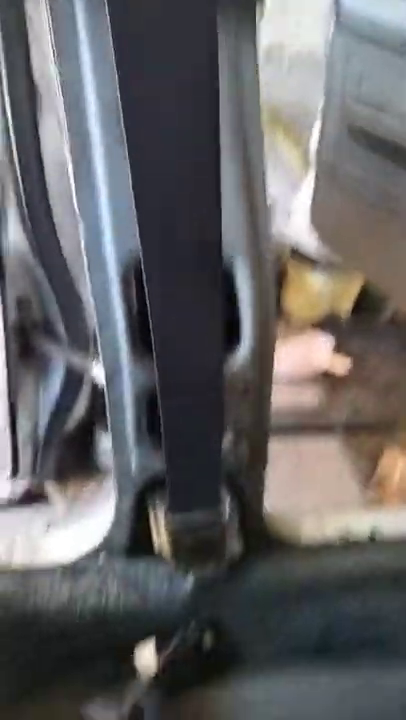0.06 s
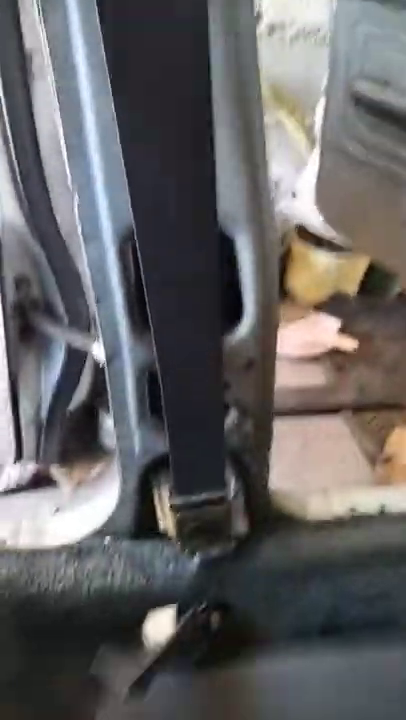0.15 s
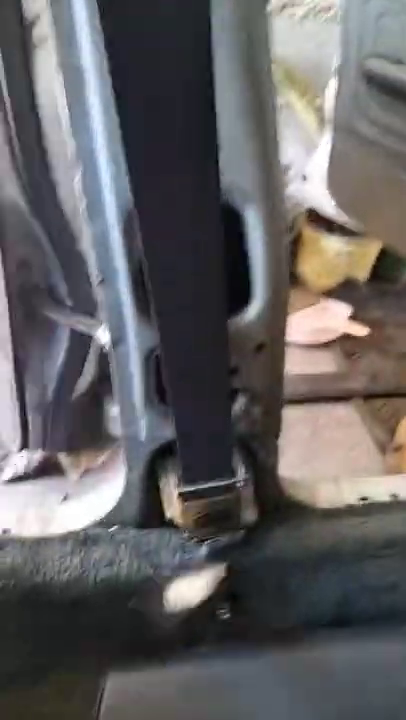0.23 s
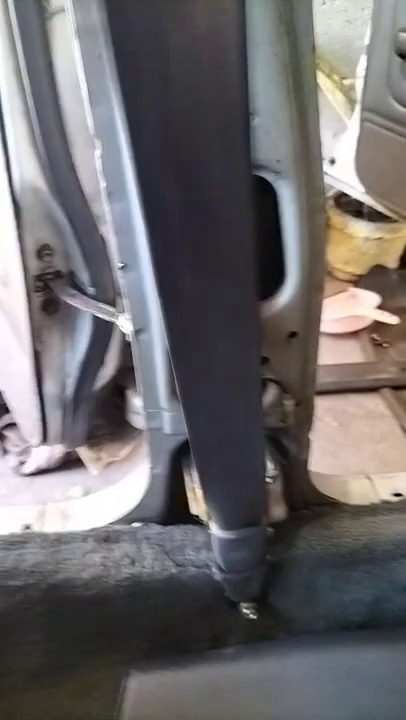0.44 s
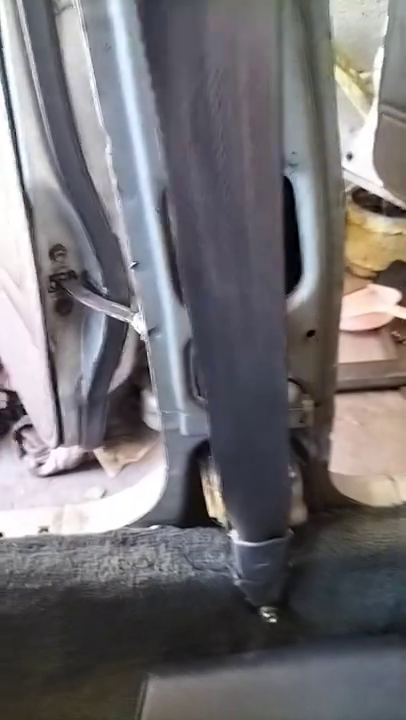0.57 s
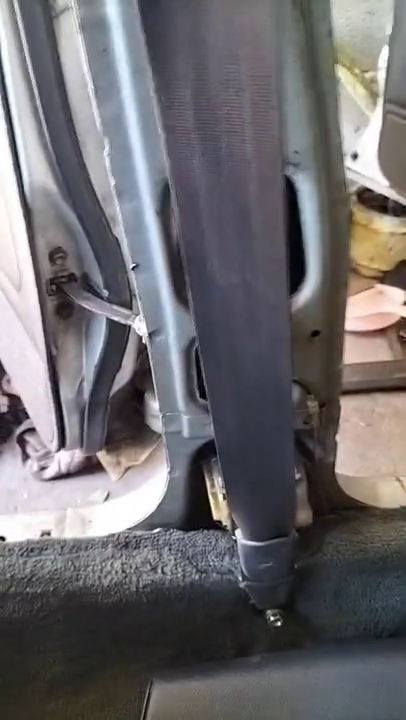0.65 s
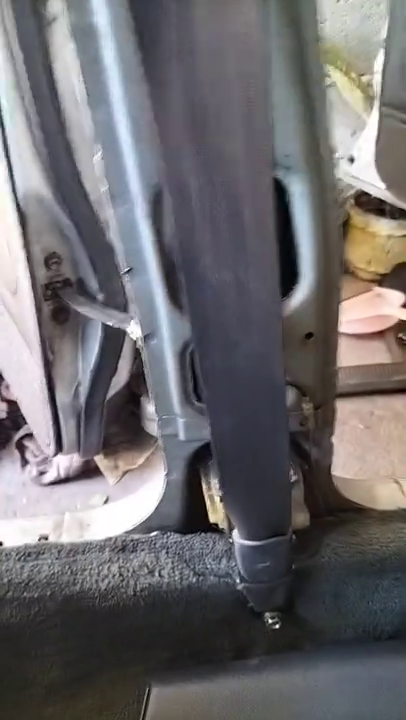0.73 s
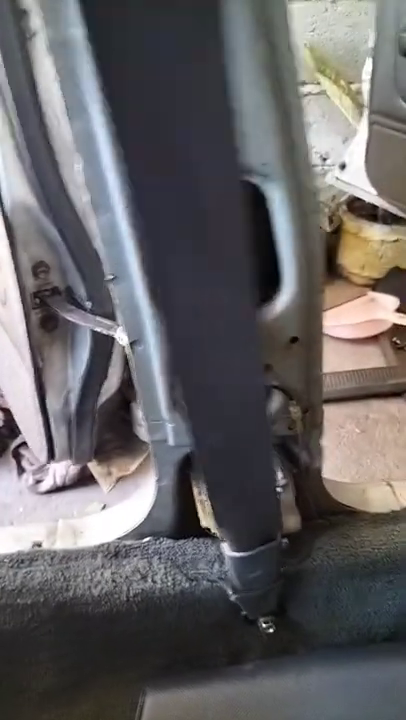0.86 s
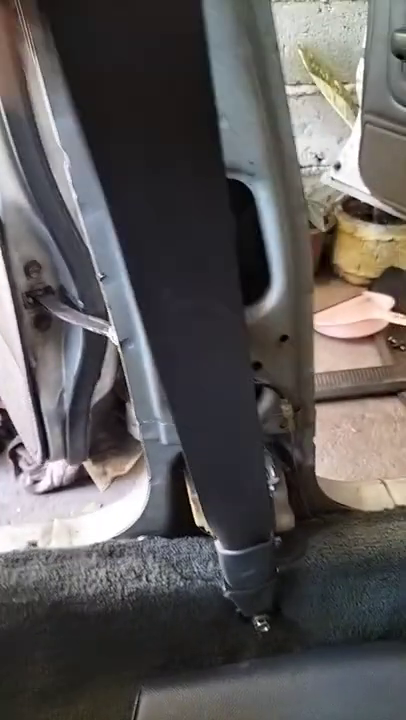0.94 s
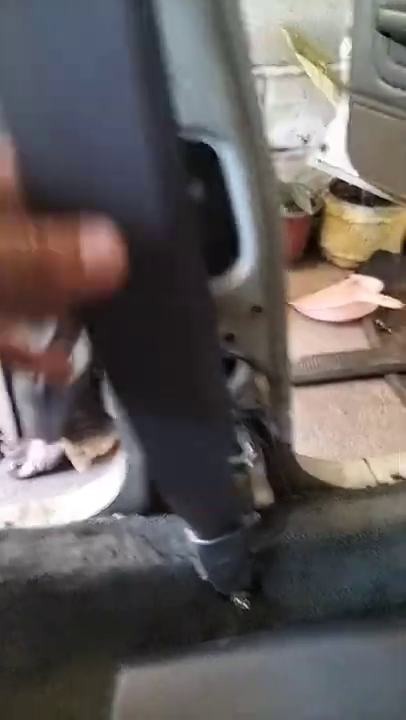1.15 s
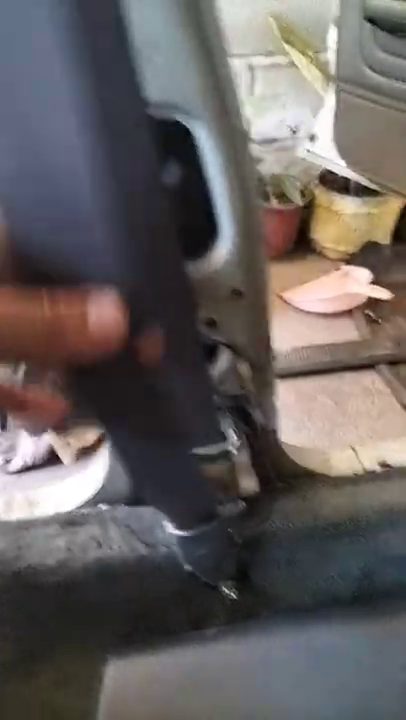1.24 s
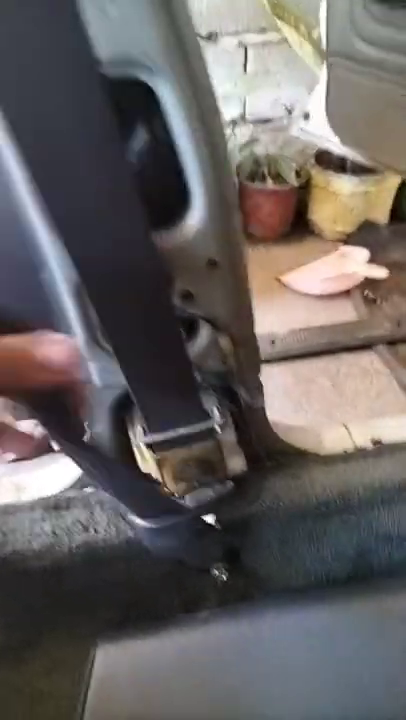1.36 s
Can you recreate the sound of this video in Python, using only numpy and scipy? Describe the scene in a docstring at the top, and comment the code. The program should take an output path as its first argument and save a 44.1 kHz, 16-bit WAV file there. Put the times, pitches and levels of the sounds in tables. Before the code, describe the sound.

A car seat belt retracts, heard close at an open door in quiet outdoor air. Soft sliding leads into a whine rising from about 0.15 to 0.37 seconds, with rushing webbing and rattling spool. Plastic knocks and metal clinks cluster from 0.32 to 0.5, then a snap at 0.58. Faint bird chirps follow, finger taps from 0.82, a brief creak near 0.97, and soft rubbing with thin squeaks until the end.

```python
"""Quiet outdoor air and softly sliding webbing open the scene: a car seat belt winds back, close by, door open.
The webbing whines upward (rising sines) and rushes through its guide (grains of friction).
Trim and tongue clack (struck modes and noise tails), and one last snap stops the belt.
Then a hand takes the belt, which creaks through resonances and rustles in grains,
while small birds chirp outside in short falling sines."""
import sys
import numpy as np
from scipy import signal
from scipy.fft import rfft, irfft
from scipy.io import wavfile

SR = 44100
rng = np.random.default_rng(int(sys.argv[2]) if len(sys.argv) > 2 else 0)


def transcribe(u):
    """Save the signal u as a 16-bit wav file named by the first command-line argument.

    u: samples, shape (n,) or (channels, n), limited to [-1, 1]; the rate is SR.
    q: integer samples, one column per channel.
    """
    v = np.clip(np.atleast_2d(u).T, -1, 1)
    q = np.round(v * 32767).astype(np.int16)
    wavfile.write(sys.argv[1], SR, q)


N = 61739
T = np.arange(N) / SR  # scene time, s
HIT = T[:SR // 4]  # time since a blow, s


def amp(db):
    """Decibels to gain."""
    return 10 ** (np.asarray(db) / 20)


def unit(x):
    """Scales to rms 1."""
    return x / np.sqrt(np.mean(x ** 2) + 1e-20)


def blow(x):
    """Scales a hit to the energy of 10 ms at rms 1."""
    return x / np.sqrt(np.sum(x ** 2) / (SR / 100) + 1e-20)


def level(points):
    """Gain over time from rows of (time_s, level_db), held flat beyond the ends."""
    return amp(np.interp(T, *np.transpose(points)))


def read(points, hz):
    """Reads a table on a log-frequency axis."""
    f, value = np.transpose(points)
    return np.interp(np.log(hz + 1), np.log(f + 1), value)


def add(mix, s, sound):
    """Mixes a sound in at time s."""
    part = mix[max(round(s * SR), 0):][:len(sound)]
    part += sound[:len(part)]


def colour(x, points):
    """Causal minimum-phase filter with the given spectrum."""
    log_gain = np.log(amp(read(points, abs(np.fft.fftfreq(4096, 1 / SR)))))
    spectrum = np.exp(np.conj(signal.hilbert(log_gain)))
    taps = np.fft.ifft(spectrum).real[:2048]
    return signal.fftconvolve(x, taps)[:len(x)]


def wander(hz):
    """Smooth chance, fading out around the given rate, rms 1."""
    keep = np.exp(-(np.fft.rfftfreq(N, 1 / SR) / hz) ** 2)
    return unit(irfft(rfft(rng.standard_normal(N)) * keep, N))


def resonate(x, hz, width):
    """One resonance with steep skirts (the peak filter runs twice), rms 1."""
    b, a = signal.iirpeak(hz, hz / (width * np.pi / 2), SR)
    once = signal.lfilter(b, a, x)
    return unit(signal.lfilter(b, a, once))


def body(x, modes):
    """Several resonances side by side, rms 1."""
    return unit(sum(amp(db) * resonate(x, hz, width) for hz, width, db in modes))


def sweep(x, hz, width):
    """A resonance that follows the curve hz, rms 1."""
    turn = np.exp(2j * np.pi * np.cumsum(hz) / SR)
    r = np.exp(-np.pi * width / SR)
    # shift the moving pitch to zero, smooth, shift back
    smoothed = signal.lfilter([1 - r], [1, -r], x / turn)
    return unit((turn * smoothed).real)


def grains(per_s, spread_db):
    """Friction: tiny slips of uneven size and random sign at random times, rms 1."""
    size = amp(spread_db * np.minimum(rng.exponential(1, N), 4))
    sign = rng.choice([-1, 1], N)
    return unit(size * sign * (rng.random(N) < per_s / SR))


def dying(t60):
    """Exponential decay of a hit, 60 dB in t60 seconds."""
    return np.exp(-np.log(1000) * HIT / t60)


def ring(modes):
    """Struck modes as decaying sines, neighbours in opposite sign."""
    out = np.zeros(len(HIT))
    for k, (hz, db, t60) in enumerate(modes):
        out += (-1) ** k * amp(db) * dying(t60) * np.sin(2 * np.pi * hz * HIT)
    return blow(out)


def scatter():
    """Dense reflections of random sign."""
    return rng.choice([-1., 1.], len(HIT))


def click(points):
    """One hard contact with the given spectrum."""
    return blow(colour(signal.unit_impulse(len(HIT)), points))


def cabin(x):
    """Reflections from pillar and door ripple the spectrum of a steady sound; rms 1."""
    echoes = scatter() * dying(t60=0.067)
    reflected = signal.fftconvolve(x, echoes / np.linalg.norm(echoes))[:N]
    return unit(x + amp(-1.5) * reflected)


def outdoors():
    """Quiet air as coloured noise, and a low hum of two lines wavering in pitch and level."""
    # spectrum of the air: pitch_hz, density_db (dB per Hz)
    air_colour = [(15, -35), (25, -3.5), (75, 2), (469, -16), (702, -11), (1110, -20.5), (1340, -17),
                  (2010, -23.5), (2840, -21.5), (3080, -36), (4040, -21.5), (5140, -39.5), (15500, -44.5)]
    # low hum outside: time_s, level_db
    hum_level = [(0, -89), (.5, -71), (.7, -78), (1.05, -76), (1.15, -66.5), (1.4, -77)]
    # lines of the hum: pitch_hz, relative_db
    hum_lines = [(60, -1), (87.5, 1.5)]
    air_db = -74.5

    hum = np.zeros(N)
    for hz, db in hum_lines:
        pitch = hz * (1 + 0.045 * wander(10.5))
        line = np.sin(2 * np.pi * np.cumsum(pitch) / SR)
        hum += amp(db) * line * (1 + 0.21 * wander(30))
    air = unit(colour(rng.standard_normal(N), air_colour))
    return amp(air_db) * air + unit(hum) * level(hum_level)


def birds():
    """Short falling chirps, blurred by dense decaying reflections from the yard."""
    # falling chirps: start_s, length_s, start_pitch_hz, peak_db
    chirps = [(0.596, 0.04, 3966, -65.5), (0.728, 0.032, 2983, -63), (0.756, 0.033, 4320, -75),
              (.76, 0.017, 2710, -92), (0.876, 0.055, 3100, -72.5), (1.188, 0.042, 3930, -69),
              (1.205, 0.02, 3650, -73), (1.34, 0.032, 4185, -69), (1.36, 0.025, 3690, -66)]
    fall, jitter = 0.1244, 0.02  # fractions of the start pitch
    yard_db, yard_t60_s = 2, 0.12

    out = np.zeros(N)
    for s, length, hz, db in chirps:
        u = np.arange(0, length, 1 / SR) / length
        pitch = hz * (1 - fall * u + jitter * wander(300)[:len(u)])
        tone = np.sin(2 * np.pi * np.cumsum(pitch) / SR)
        add(out, s, amp(db) * np.sin(np.pi * u) * tone)
    yard = scatter() * dying(yard_t60_s)
    blurred = signal.fftconvolve(out, yard / np.linalg.norm(yard))[:N]
    return out + amp(yard_db) * blurred


def scuffs():
    """Cloth brushes past: resonant noise with a quick rise and a slower fade."""
    # brief scuffs of cloth: start_s, length_s, level_db, centre_hz, width_hz
    brushes = [(.056, .045, -74, 7100, 350), (.056, .03, -75, 8000, 300), (.44, .05, -67, 7450, 250),
               (.345, .05, -80, 13000, 3000), (.982, .04, -70, 4900, 700), (1.228, .05, -83, 13200, 3000)]

    out = np.zeros(N)
    for s, length, db, hz, width in brushes:
        u = np.arange(0, length, 1 / SR) / length
        swell = np.sin(np.pi * np.sqrt(u))
        cloth = resonate(rng.standard_normal(N), hz, width)[:len(u)]
        add(out, s, amp(db) * swell * cloth)
    return out


def squeak():
    """Skin squeaks thinly on the weave: a narrow noise band, sinking as the hand slows."""
    # skin on the weave: time_s, pitch_hz, level_db
    squeak_path = [(1.06, 6300, -94), (1.112, 5820, -76), (1.13, 5740, -87), (1.185, 5170, -75),
                   (1.24, 4980, -82.5), (1.29, 5060, -71), (1.335, 4680, -89), (1.4, 4340, -71)]
    width_hz = 150

    s, hz, db = np.transpose(squeak_path)
    hiss = resonate(rng.standard_normal(N), np.mean(hz), np.ptp(hz) * 2)
    thin = sweep(hiss, np.interp(T, s, hz), width_hz)
    return thin * np.interp(T, s, amp(db), left=0, right=0)


def finger_taps():
    """Fingers land on the taut belt: its modes ring under a softened puff of noise."""
    # finger contacts: start_s, level_db
    landings = [(0.8182, -62), (.8247, -72), (.8465, -64), (0.9164, -61), (0.928, -79), (0.9428, -64.5)]
    # modes of the taut belt: pitch_hz, relative_db, t60_s
    tap_modes = [(602.3, -5, 0.17), (1076.4, 9.5, 0.079), (1228, -7, 0.073)]
    # spectrum of the puff: pitch_hz, density_db (dB per Hz)
    tap_colour = [(120, -18), (320, 4), (450, -0.5), (750, 4), (1250, 2), (1600, -17.5), (3000, -14),
                  (6000, -43.5), (9500, -64)]
    puff_t60_s, puff_db, rise_s = 0.21, 1.5, 0.00065

    out = np.zeros(N)
    for s, db in landings:
        puff = blow(colour(scatter() * dying(puff_t60_s), tap_colour))
        soft_start = 1 - np.exp(-HIT / rise_s)
        add(out, s, amp(db) * soft_start * (ring(tap_modes) + amp(puff_db) * puff))
    return out


def creak():
    """The gripped belt sticks and slips unevenly; each slip excites its resonances."""
    # creak: time_s, level_db
    creak_level = [(.9, -87), (.942, -79), (.964, -50.5), (.978, -52.5), (.992, -55.5), (1.002, -63.5),
                   (1.03, -81.5)]
    # resonances: centre_hz, width_hz, relative_db
    creak_body = [(348, 270, -10), (463, 35, -15.5), (702, 66, -0.5), (820, 230, -6), (1031, 18.4, 0),
                  (1090, 150, -11.5), (1404, 150, -11.5), (2150, 480, -14)]
    slips_hz, jitter = 342.8, 0.11  # mean slip rate, relative deviation

    turns = np.cumsum(slips_hz * (1 + jitter * wander(331))) / SR
    # one pulse per completed turn, of uneven size
    slips = np.diff(np.floor(turns), prepend=0) * (1 + 0.58 * wander(520))
    return body(slips, creak_body) * level(creak_level)


def rub():
    """A hand rubs along the webbing: friction grains and a swish that sinks as the hand slows."""
    # hand along the webbing: time_s, level_db
    rub_level = [(.8, -108.5), (.88, -83), (.95, -74), (.995, -71), (1.02, -73.5), (1.09, -68),
                 (1.17, -70.5), (1.24, -74.5), (1.29, -74.5), (1.33, -73.5), (1.4, -73)]
    # spectrum of the friction: pitch_hz, density_db (dB per Hz)
    rub_colour = [(150, -19), (800, -17), (1000, -2), (1200, 10.5), (1450, -7), (2200, 0), (3800, 3.5),
                  (5100, 3), (6400, 1.5), (7200, 4.5), (8200, -4), (9400, -31.5), (12000, -14.5),
                  (13200, -15), (15400, -13)]
    # swish resonances at the start of the stroke: centre_hz, width_hz, relative_db
    rub_modes = [(1165, 35, 3), (7270, 340, 5.5)]
    start_s, fall_per_s, swish_db = 0.82, 0.44, -14

    friction = cabin(colour(grains(per_s=11000, spread_db=1.5), rub_colour))
    sink = np.exp(-fall_per_s * np.maximum(T - start_s, -.15))
    swish = np.zeros(N)
    for hz, width, db in rub_modes:
        swish += amp(db) * sweep(rng.standard_normal(N), hz * sink, width)
    swish = signal.sosfilt(signal.butter(8, 8000, fs=SR, output="sos"), unit(swish))
    return (friction + amp(swish_db) * swish) * level(rub_level)


def hand():
    """Fingers tap the belt, uneven stick and slip makes it creak, and skin swishes along the weave."""
    return finger_taps() + creak() + rub()


def drone():
    """The spool hums in two swells of a rising sine as it spins up."""
    # swells of the hum: centre_s, half_length_s, level_db
    hum_swells = [(0.21, 0.022, -64), (0.251, 0.013, -51.5)]
    first_swell_hz, rise_hz_per_s = 295, 247

    pitch = first_swell_hz + rise_hz_per_s * (T - hum_swells[0][0])
    swells = sum(amp(db) * np.exp(-((T - s) / half) ** 2) for s, half, db in hum_swells)
    return swells * unit(np.sin(2 * np.pi * np.cumsum(pitch) / SR))


def whine():
    """The ribs of the weave sing higher as the belt gathers speed, and the guide squeals."""
    # whine over the guide, pitch follows belt speed: time_s, pitch_hz, level_db
    whine_path = [(0.142, 460, -97), (.172, 490, -64.5), (0.181, 498, -58), (0.191, 506.3, -75),
                  (0.218, 591.8, -61.5), (.238, 651, -56.5), (.254, 779.5, -59), (0.273, 828, -47),
                  (0.286, 907.4, -66), (0.299, 944.7, -56), (.332, 994, -50.5), (0.357, 1018, -50),
                  (0.37, 906, -70)]
    # overtones: multiple, relative_db
    overtone_rows = [(2, -7), (3, -22.5)]
    # how the guide colours the overtones: pitch_hz, gain_db
    guide_colour = [(900, -6), (1250, -27), (1450, -6), (1650, -3.5), (1920, 2.5), (2200, -25), (2500, -4),
                    (2850, 18), (3100, 3)]
    # squeal of the guide while the belt runs: time_s, level_db
    squeal_level = [(.13, -85.5), (.185, -58.5), (.205, -57.5), (.228, -74), (.25, -63.5), (.275, -56.5),
                    (.31, -55), (.42, -64.5), (.46, -65), (.55, -101)]
    # squeal resonances: centre_hz, width_hz, relative_db
    squeal_modes = [(1555, 57, -1.5), (1714, 43, 0), (3865, 88, -1)]
    jitter, flutter = 0.005, 0.2  # relative deviation of pitch and of level

    s, hz, db = np.transpose(whine_path)
    pitch = np.interp(T, s, hz)
    turns = np.cumsum(pitch * (1 + jitter * wander(160))) / SR
    tone = np.sin(2 * np.pi * turns) * (1 + flutter * wander(130))
    for k, part_db in overtone_rows:
        gain = amp(part_db + read(guide_colour, k * pitch))
        tone += gain * np.sin(2 * np.pi * k * turns) * (1 + flutter * wander(130))
    tone *= np.sqrt(2)  # a steady fundamental has rms 1
    squeal = body(rng.standard_normal(N), squeal_modes)
    return tone * np.interp(T, s, amp(db), left=0, right=0) + squeal * level(squeal_level)


def webbing_rush():
    """Webbing slides unevenly through the guide as grains, and the reel's small parts chatter."""
    # webbing through the guide: time_s, level_db
    slide_level = [(0, -70), (.12, -66.5), (.19, -62.5), (.23, -61.5), (.28, -54.5), (.31, -52), (.35, -46),
                   (.376, -49.5), (.402, -53.5), (.425, -51.5), (.445, -53), (.47, -52), (.52, -69),
                   (.56, -65.5), (.66, -76)]
    # spectrum of the slide: pitch_hz, density_db (dB per Hz)
    slide_colour = [(100, -53), (400, 5.5), (1000, -1.5), (1350, -8), (1650, -15), (2200, -2.5),
                    (2900, -0.5), (3900, 0.5), (4700, -10), (5500, -7.5), (6400, -16.5), (7400, -12.5),
                    (8400, -26), (9300, -48.5), (12000, -35), (15500, -37.5)]
    flicker, flicker_hz = 0.18, 167
    ticks_per_s, ticks_db = 470, -8.5
    thin_hz, full_db = 2690, -47

    rush = cabin(colour(grains(per_s=4500, spread_db=3), slide_colour))
    ticks = unit(colour(grains(ticks_per_s, spread_db=-0.5), slide_colour))
    rush = unit(rush * (1 + flicker * wander(flicker_hz)) + amp(ticks_db) * ticks)
    # a slow belt only hisses; the body comes in with speed
    thin = signal.filtfilt(*signal.butter(2, thin_hz, "high", fs=SR), rush)
    full = np.sqrt(np.minimum(level(slide_level) / amp(full_db), 1))
    return (thin + full * (rush - thin)) * level(slide_level)


def spool_rattle():
    """The spool rattles in the hollow pillar: sparse grains excite the pillar's resonances."""
    # spool: time_s, level_db
    spool_level = [(0, -81.5), (.16, -73), (.205, -63.5), (.272, -61.5), (.305, -48.5), (.325, -51),
                   (.36, -49), (.395, -49), (.43, -51.5), (.47, -49), (.52, -61), (.55, -58), (.62, -81)]
    # hollow of the pillar: centre_hz, width_hz, relative_db
    pillar_modes = [(321.5, 133, -1), (560, 165, -4), (738, 130, -12.5)]
    return body(grains(per_s=600, spread_db=3.5), pillar_modes) * level(spool_level)


def slack_slap():
    """Slack webbing flaps against the pillar: a low resonant burst of noise."""
    peak_s, rise_s, fall_s = .462, 0.017, 0.019
    swell = np.exp(-np.where(T < peak_s, (peak_s - T) / rise_s, (T - peak_s) / fall_s))
    return amp(-49.5) * swell * resonate(rng.standard_normal(N), hz=165, width=85)


def retractor():
    """Webbing rushes through the guide while the spool rattles and slack webbing slaps the pillar."""
    return webbing_rush() + spool_rattle() + slack_slap()


def knock(db, bright_hz, ring_db):
    """A blow rings the trim panel and spreads through the pillar and cabin."""
    # modes of the trim: pitch_hz, relative_db, t60_s
    trim_modes = [(330, 1, 0.07), (541, 3.5, 0.046), (722, 4, 0.027), (829, -4, 0.1), (1042, 6.5, 0.026),
                  (1178, 6.5, 0.024), (1510, -7.5, 0.025), (2460, 10.5, 0.0031), (3330, -12, 0.033)]
    # spectrum of contact and tail: pitch_hz, density_db (dB per Hz)
    trim_wash = [(40, -54), (100, -28.5), (220, -8), (320, -2.5), (450, -6.5), (650, 0), (1100, 1.5),
                 (1450, -2.5), (2100, -8.5), (2800, -4), (4000, -4), (4600, -15.5), (7500, -49),
                 (9500, -65)]
    # decay of the tail: pitch_hz, t60_s
    wash_t60 = [(200, 0.26), (1000, 0.09), (4000, 0.08), (9000, 0.1)]
    crack_db = -9.5  # the first contact

    # each band of the tail dies at its own pace
    hz, t, bands = signal.stft(scatter(), SR, nperseg=256)
    bands = bands * np.exp(-np.log(1000) * t / read(wash_t60, hz)[:, None])
    tail = signal.istft(bands, SR, nperseg=256)[1][:len(HIT)]
    soft_start = 1 - np.exp(-HIT / 0.0022)
    tail = blow(colour(tail * soft_start, trim_wash))
    hit = ring(trim_modes) + amp(crack_db) * click(trim_wash) + amp(ring_db) * tail
    soft = signal.butter(1, min(bright_hz, SR / 4), fs=SR)
    return amp(db) * blow(signal.lfilter(*soft, hit))


def clacks():
    """Fittings knock on the trim, the metal tongue clinks, and a snap ends it as the belt comes taut."""
    # knocks on the plastic trim: start_s, level_db, brightness_hz, tail_db
    knock_rows = [(0.3171, -44, 3500, 5), (0.32, -43, 890, -8), (0.3229, -46, 690, 3),
                  (0.3625, -44.5, 2000, 2), (0.3779, -45.5, 2416, 5), (0.3791, -36.5, 1307, -11),
                  (0.3857, -39, 820, -29), (0.392, -44.5, 489, -2), (0.4112, -43.5, 1200, -13.5),
                  (.4160, -42, 1410, -6), (0.4832, -42, 7000, 7.5), (0.4855, -37.5, 1860, -3),
                  (.4938, -44.5, 2220, 6)]
    # clinks of the tongue: start_s, level_db
    clink_rows = [(0.336, -52), (0.3472, -47), (0.3909, -50.5), (0.4052, -42.5), (0.4091, -42.5),
                  (0.4122, -43.5), (0.4169, -50), (0.4273, -53.5)]
    # spectrum of the tongue: pitch_hz, density_db (dB per Hz)
    tongue_colour = [(50, -74), (300, -14), (1100, 0), (1600, -4), (2200, -9.5), (2850, 5.5), (3300, -2.5),
                     (4000, 4.5), (4800, -3.5), (5600, -8.5), (6500, -22), (7300, -9.5), (8500, -21),
                     (9400, -64), (15000, -55)]
    # modes of the tongue: pitch_hz, relative_db, t60_s
    tongue_modes = [(1585, -11, 0.14), (2600, -8, 0.033), (3420, -7, 0.22), (4180, 6, 0.042),
                    (4120, 0, 0.072)]
    # modes of the snap: pitch_hz, relative_db, t60_s
    snap_modes = [(1187, -4, 0.012), (1590, -5.5, 0.003), (2360, -1, 0.0076), (2760, -0.5, 0.0061),
                  (3760, -15.5, 0.0022)]
    # spectrum of the snap's tail: pitch_hz, density_db (dB per Hz)
    snap_colour = [(50, -31), (300, -17), (900, -15), (1200, -3), (1850, -15.5), (2400, -2), (2850, -13),
                   (3150, -17), (3550, -20), (4200, -7.5), (5400, -23), (7200, -35), (9300, -64)]
    tongue_t60_s, tongue_tick_db, tongue_ring_db = 0.033, -7.5, -8
    snap_s, snap_db, snap_tail_db, snap_t60_s = 0.5763, -43.5, -8, .06
    jerk_db = -18  # the snap also jerks the tongue

    out = np.zeros(N)
    for s, *row in knock_rows:
        add(out, s, knock(*row))
    for s, db in clink_rows:
        clink = blow(colour(scatter() * dying(tongue_t60_s), tongue_colour))
        clink = clink + amp(tongue_tick_db) * click(tongue_colour)
        clink = clink + amp(tongue_ring_db) * ring(tongue_modes)
        add(out, s, amp(db) * clink)
    snap = signal.lfilter(*signal.butter(4, 6000, fs=SR), ring(snap_modes))
    tail = blow(colour(scatter() * dying(snap_t60_s), snap_colour))
    snap = snap + amp(jerk_db) * click(tongue_colour) + amp(snap_tail_db) * tail
    add(out, snap_s, amp(snap_db) * snap)
    return out


def scene():
    """Yard, hand and belt summed to mono."""
    background = outdoors() + birds()
    handling = scuffs() + squeak() + hand()
    belt = drone() + whine() + retractor() + clacks()
    return (background + handling + belt)[None]


def record(dry):
    """Low cut, then a band limit at the top."""
    low_cut_hz, edge_hz = 34, 15550
    cut = signal.sosfilt(signal.butter(4, low_cut_hz, "high", fs=SR, output="sos"), dry)
    band_limit = signal.firwin(511, edge_hz, window=("kaiser", 9), fs=SR)
    return signal.oaconvolve(cut, band_limit[None], "same")


dry = scene()
out = record(dry)
transcribe(out)
```